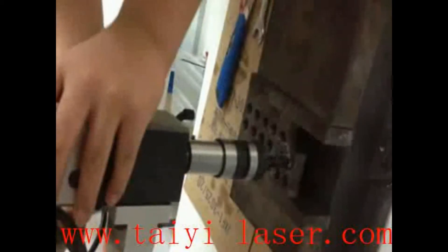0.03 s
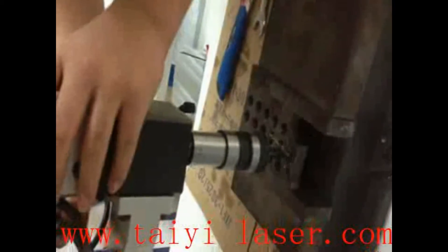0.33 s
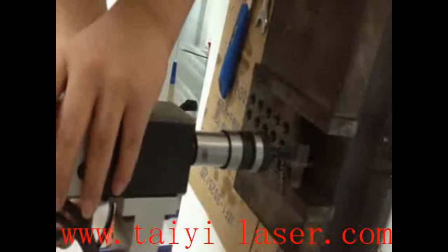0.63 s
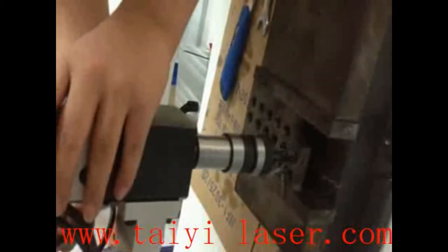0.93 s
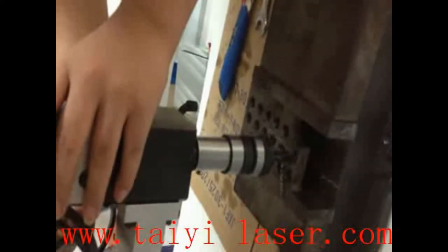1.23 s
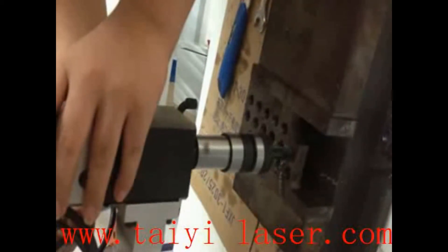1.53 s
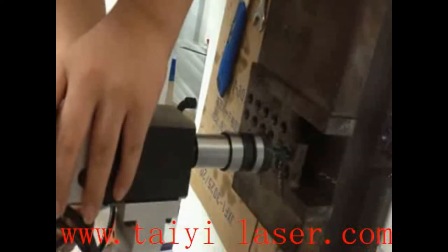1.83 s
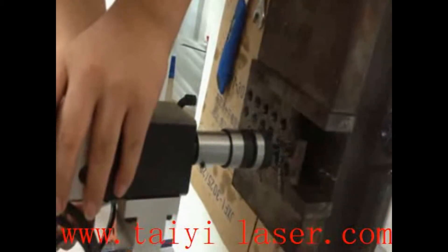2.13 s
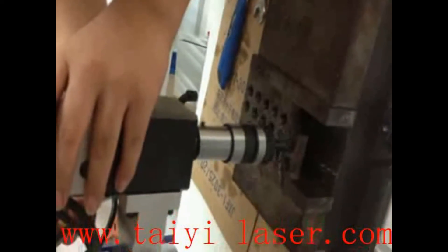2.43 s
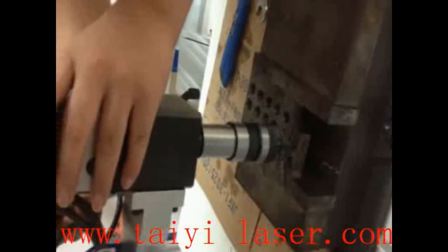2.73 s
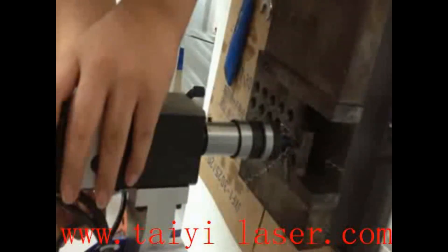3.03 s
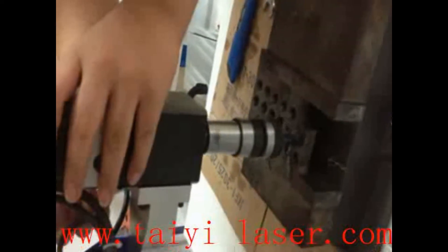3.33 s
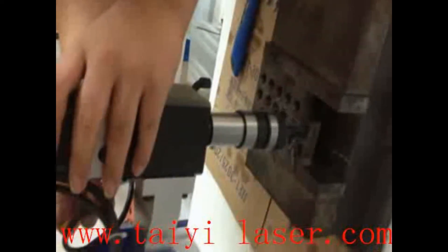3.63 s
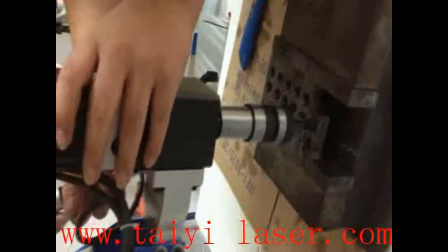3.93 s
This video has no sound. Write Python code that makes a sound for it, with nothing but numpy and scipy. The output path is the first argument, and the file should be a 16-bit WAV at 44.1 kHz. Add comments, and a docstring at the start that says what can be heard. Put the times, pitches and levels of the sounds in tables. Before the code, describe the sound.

An electric tapping machine whines and rasps steadily, stops for an instant, then reverses.

```python
"""Electric tapping machine

Close by in a humming workshop, a servo motor drives a tap through a reduction gear, stops for an
instant, takes up the backlash with a tick and backs out a little faster. The meshing teeth whine and
rasp over a running hiss, the motor drive whistles, and twice the sound drops out for a moment."""
import sys
import numpy as np
from scipy.fft import rfft, irfft, next_fast_len
from scipy.io import wavfile
from scipy.ndimage import map_coordinates

SR = 44100
rng = np.random.default_rng(int(sys.argv[2]) if len(sys.argv) > 2 else 0)


def unload_wav(signal):
    """Save mono or channel-first audio to the path in sys.argv[1] as 16-bit WAV at rate SR, clipped to [-1, 1]."""
    wavfile.write(
        sys.argv[1],
        SR,
        np.round(np.clip(np.atleast_2d(signal).T, -1, 1) * 32767).astype(np.int16),
    )


N = 176400
TEETH, REDUCTION, POLE_PAIRS = 21, 4, 4

# motor move, negative = backing out: t/s, speed/(turns/s)
SHAFT_SPEED = [(0, 33.33), (3.24, 33.33), (3.265, 23), (3.29, 11), (3.33, 5), (3.36, 0), (3.385, -16),
               (3.41, -27.5), (3.44, -33.5), (3.47, -37.3), (3.51, -38.3), (4, -38.3)]
# load on the gears, as fader rides: t/s, whine level/dB, rasp level/dB, hiss level/dB
GEAR_LOAD = [(0, -1.5, -1, -4), (.35, .5, -1, 9), (.65, -0.5, 0.5, -2), (1.25, 1, 0, 11),
             (2.1, 0, -0.4, -3), (2.45, -2, -1, -11), (2.8, -2, -4.5, -7), (3.07, -3.5, -5.5, 8),
             (3.24, -8, -9, 8), (3.45, -9, -4, 1), (3.53, -1.5, -3.5, -3), (3.65, -2.5, -1, -4),
             (3.8, -2.5, -2, 2), (3.9, 1, -4, 1), (4, -1, -1.5, -1)]
WORK_SPEED = SHAFT_SPEED[0][1]

def machine():
    """Every layer follows the shaft; each direction plays its own tooth flanks."""
    speed, = curves(SHAFT_SPEED)
    whine_db, rasp_db, hiss_db = curves(GEAR_LOAD)
    turns = np.cumsum(abs(speed)) / SR
    pace = abs(speed) / WORK_SPEED + 1e-6
    forward = speed > 0
    whine_in = whine(turns, rasp_db, column=1, tooth_error=0.013, flutter=0.038, rough=0.43, throb_db=1.5)
    whine_out = whine(turns, rasp_db, column=2, tooth_error=0.016, flutter=0.048, rough=0.34, throb_db=2.7)
    tones = amp(whine_db) * np.where(forward, whine_in, amp(-3) * whine_out)
    rasp_in = rasp(turns, RASP_IN_EQ, repeat=0.43, tooth_db=2.5, beat_db=0.5, beats=1, ring_db=-6)
    rasp_out = rasp(turns, RASP_OUT_EQ, repeat=0.41, tooth_db=-0.5, beat_db=0.3, beats=4, ring_db=-6.5)
    scrape = amp(rasp_db) * np.where(forward, amp(-30.5) * rasp_in, amp(-33.5) * rasp_out)
    motor = np.where(forward, rotor(turns, column=1, rough=0.35), rotor(turns, column=2, rough=0.25))
    running = scrape + motor + hiss(hiss_db)
    # the whine dies away first as the shaft slows
    return pace ** 4.6 * tones + pace ** 0.99 * running + drive_whistle(turns, pace)


# whine partials: multiple of the mesh rate, relative level in/dB, relative level out/dB
MESH_PARTIALS = [(1, -47, -39.5), (2, -48, -48.5), (3, -35, -46), (4, -37, -63), (5, -44.5, -50.5),
                 (6, -44, -48.5), (7, -45, -60), (8, -52.5, -65), (9, -51, -68), (10, -48, -68),
                 (12, -53, -73)]
LEAD_HARMONIC, TIGHT_SPOT_S = 3, 0.108  # first tight spot of the output gear
BRIGHTEN = 0.14  # dB per upper harmonic, for each dB of rasp

def whine(turns, rasp_db, column, tooth_error, flutter, rough, throb_db):
    """Mesh harmonics, smeared by uneven teeth, brighter under load, throbbing with shaft and output gear."""
    smear = tooth_error * surface(turns, count=7) + flutter * wobble(40)
    gear_swell = np.cos(2 * np.pi * (turns - TIGHT_SPOT_S * WORK_SPEED) / REDUCTION)
    shaft_db = throb_db * np.cos(2 * np.pi * turns)
    out = np.zeros(N)
    for row in MESH_PARTIALS:
        k = row[0]
        gear_db = (4 if k == LEAD_HARMONIC else 4 / 3) * gear_swell
        contact = 1 + rough * wobble(45) + 0.27 * surface(turns, count=9)
        tone = np.sin(2 * np.pi * (k * (TEETH * turns + smear) + rng.random()))
        lift_db = BRIGHTEN * max(k - LEAD_HARMONIC - 1, 0) * rasp_db
        out += amp(row[column] + lift_db) * unit(contact * amp(gear_db + shaft_db) * tone)
    return out


# rasp colour, driving in and backing out: f/Hz, relative level/dB
RASP_IN_EQ = [(590, -39), (1000, -35), (1190, -28), (1290, -34), (1380, -9), (1490, -15), (1630, -4),
              (1910, -10.5), (2090, -5), (2420, -5), (2880, -2), (3210, -11.5), (4180, -12.5), (4430, -14),
              (4800, -13.5), (5890, -22), (6960, -18.5), (7530, -22), (10400, -19), (13500, -64),
              (22000, -120)]
RASP_OUT_EQ = [(590, -49), (1000, -24), (1250, -2), (1400, -29), (1630, 3), (1890, -17), (2370, 3),
               (2770, -4), (3180, -4.5), (3570, -7), (3900, -14), (4260, -9), (4940, -17.5), (6130, -18.5),
               (10400, -14), (13500, -65), (22000, -120)]
# housing resonances: f/Hz, width/Hz, relative level/dB
HOUSING_MODES = [(1235, 35, -1.5), (1646, 47, -0.5), (2079, 49, 5.5), (2766, 40, -6), (3810, 30, -0.5)]

def rasp(turns, spectrum, repeat, tooth_db, beat_db, beats, ring_db):
    """Scraping teeth ring the housing; the force pulses with each tooth and `beats` times a turn."""
    grit = rng.standard_normal(N) + repeat * surface(turns, count=1100)
    pulse_db = tooth_db * np.cos(2 * np.pi * TEETH * turns) + beat_db * np.cos(2 * np.pi * beats * turns)
    scrape = grit * amp(pulse_db + 0.94 * wobble(24.6))
    ring = filtered(scrape, lambda f: sum(amp(db) * 1j * f * width / (f0 * f0 - f * f + 1j * f * width)
                                          for f0, width, db in HOUSING_MODES))
    return coloured(scrape, spectrum) + amp(ring_db) * unit(ring)


# motor partials at working speed: multiple of the shaft rate, level in/dB, level out/dB
MOTOR_PARTIALS = [(23.89, -46, -74), (31.33, -91, -47), (36.84, -51.5, -54), (48.7, -57, -63),
                  (49, -55, -65), (70.3, -46.5, -67), (76, -49, -59), (79.6, -61, -49)]

def rotor(turns, column, rough):
    """The motor sings in slightly unsteady tones that track the shaft."""
    return sum(amp(row[column]) * (1 + rough * wobble(24.75))
               * np.sin(2 * np.pi * (row[0] * turns + rng.random())) for row in MOTOR_PARTIALS)


# hiss colour: f/Hz, relative level/dB
HISS_EQ = [(1000, -25), (3000, -3), (4500, 0), (6000, -4), (8500, -1), (10400, -2)]

def hiss(load_db):
    """Bright running noise that rides the load."""
    return amp(load_db - 47.5) * coloured(rng.standard_normal(N), HISS_EQ)


# whistle sidebands: offset from the switching tone/winding frequencies, level/dB
WHISTLE_BANDS = [(-5, -57), (-3, -56), (-1, -57), (1, -64), (3, -50)]
SWITCH_HZ, IDLE_DB, IDLE_PACE = 10000, -50, 0.3

def drive_whistle(turns, pace):
    """The drive's switching tone: bare at a standstill, split into sidebands once the field turns."""
    carrier = SWITCH_HZ * np.arange(N) / SR
    field = POLE_PAIRS * turns
    split = sum(amp(db + wobble(16)) * np.sin(2 * np.pi * (carrier + k * field + rng.random()))
                for k, db in WHISTLE_BANDS)
    bare = amp(IDLE_DB) * np.exp(-(pace / IDLE_PACE) ** 2) * np.sin(2 * np.pi * (carrier - field))
    return bare + np.minimum(pace, 1) ** 2 * split


# tick colour: f/Hz, relative level/dB
TICK_EQ = [(300, -23), (1500, -3), (4000, -7), (7000, -11), (9200, -5), (10400, -5)]
TICK_S, TICK_DB, TICK_T60_S = 3.373, -28, 0.035

def backlash():
    """The teeth land on their other flanks with a small, dry tick."""
    age = np.arange(N) / SR - TICK_S
    envelope = (age > 0) * amp(TICK_DB - 60 * abs(age) / TICK_T60_S)
    return envelope * coloured(rng.standard_normal(N), TICK_EQ)


# room tone colour: f/Hz, relative level/dB
SHOP_EQ = [(20, -27), (50, -23), (90, -10.5), (115, -14), (138, 4.5), (165, -1), (210, 4), (265, 2),
           (320, -2.5), (450, -3.5), (600, -6.5), (850, -7), (1050, -10.5), (2200, -13), (4000, -17.5),
           (6000, -29.5), (10400, -26)]
SHOP_DB, HUM_HZ, HUM_DB = -36.5, 225.8, -36.5

def workshop():
    """The bed: a steady rush of machinery with a wavering hum."""
    hum_level = amp(HUM_DB + 0.68 * wobble(10))
    hum = hum_level * np.sin(2 * np.pi * HUM_HZ * np.arange(N) / SR + 0.26 * wobble(8))
    return hum + amp(SHOP_DB) * coloured(rng.standard_normal(N), SHOP_EQ)


def amp(db):
    return 10 ** (np.asarray(db) / 20)


def unit(x):
    return x / np.sqrt(np.mean(x ** 2) + 1e-20)


def eq_gain(points, hz):
    """Gain of an EQ curve drawn on a log frequency axis."""
    f, db = np.transpose(points)
    return amp(np.interp(np.log(hz + 1), np.log(f + 1), db))


def curves(rows):
    """One automation lane for each column after the time."""
    times, *lanes = np.transpose(rows)
    return [np.interp(np.arange(N) / SR, times, lane) for lane in lanes]


def wobble(rate):
    """A smooth random curve, rate knots a second."""
    return map_coordinates(rng.standard_normal(int(N * rate / SR) + 4), [np.arange(N) * rate / SR])


def filtered(x, response):
    """x through a complex frequency response."""
    size = next_fast_len(N + SR // 2)
    return irfft(rfft(x, size) * response(np.fft.rfftfreq(size, 1 / SR)), size)[..., :N]


def coloured(x, spectrum):
    """x through an EQ curve, at rms 1."""
    return unit(filtered(x, lambda hz: eq_gain(spectrum, hz)))


def surface(turns, count):
    """Random unevenness of a wheel, count bumps round it, met again on every turn."""
    return unit(map_coordinates(rng.standard_normal(count), [turns % 1 * count], mode="grid-wrap"))


# stereo width: f/Hz, side level/dB
WIDTH_EQ = [(30, -14), (90, -10.5), (170, -32), (400, -16), (2500, -20.5), (5000, -14), (10000, -13)]

def scene():
    """Machine, tick and room, nearly mono, with a faint flutter between left and right."""
    mid = machine() + backlash() + workshop()
    side = filtered(mid * wobble(90), lambda hz: eq_gain(WIDTH_EQ, hz))
    return np.array([mid + side, mid - side]) * amp([[-.15], [.15]])


# dropouts: start t/s, end t/s
LEVEL_DIPS = [(.1648, .1802), (3.1412, 3.1562)]
DIP_DB, HIGH_CUT_HZ = -17.5, 10520

def record(dry):
    """The level dips briefly twice, and a steep high cut takes off the top."""
    t = np.arange(N) / SR
    dipped = sum((t > start) & (t < end) for start, end in LEVEL_DIPS)
    return filtered(dry * amp(DIP_DB * dipped), lambda hz: hz < HIGH_CUT_HZ)


dry = scene()
out = record(dry)
unload_wav(out)
```